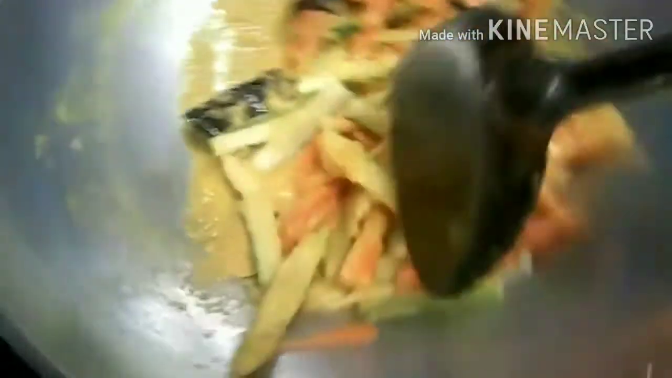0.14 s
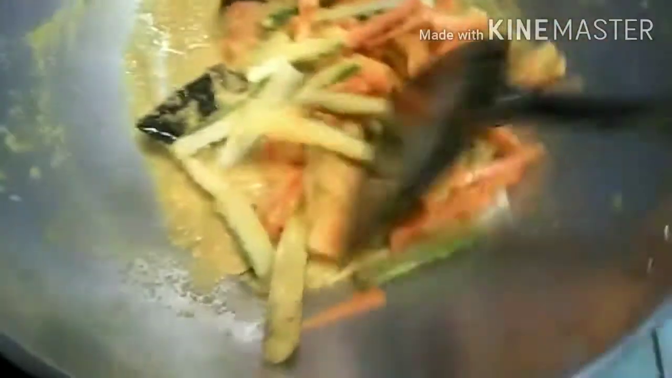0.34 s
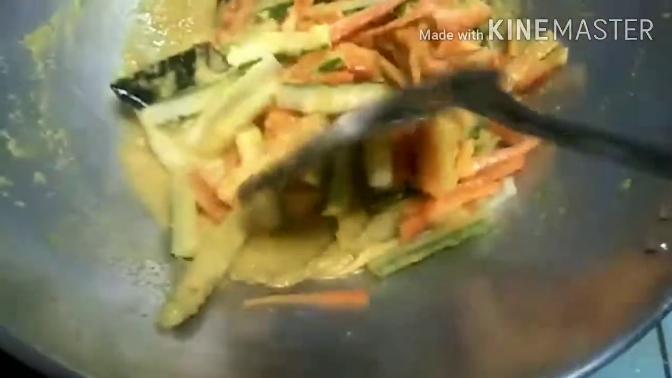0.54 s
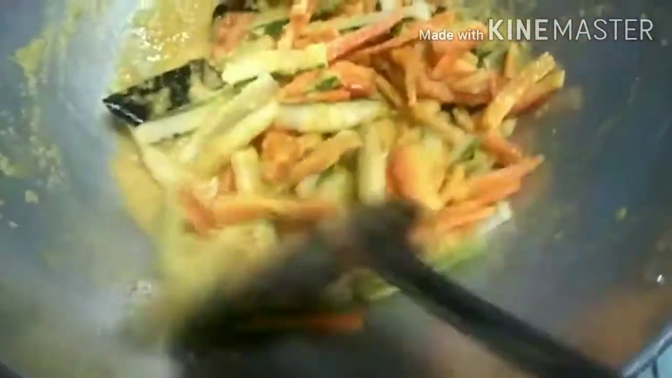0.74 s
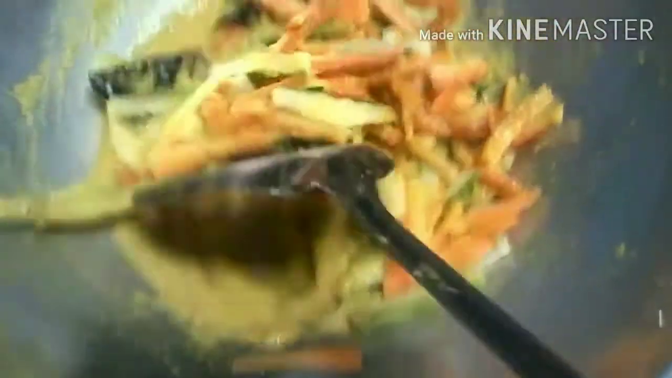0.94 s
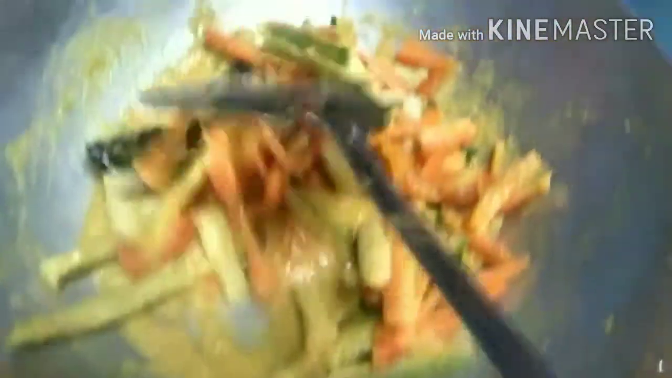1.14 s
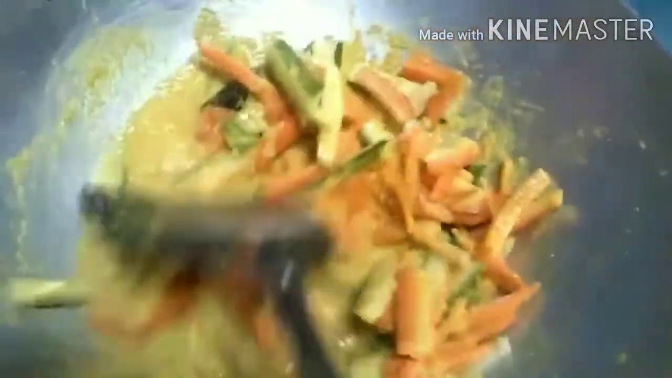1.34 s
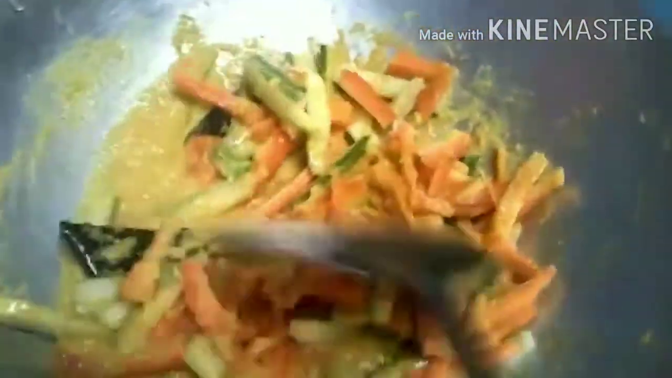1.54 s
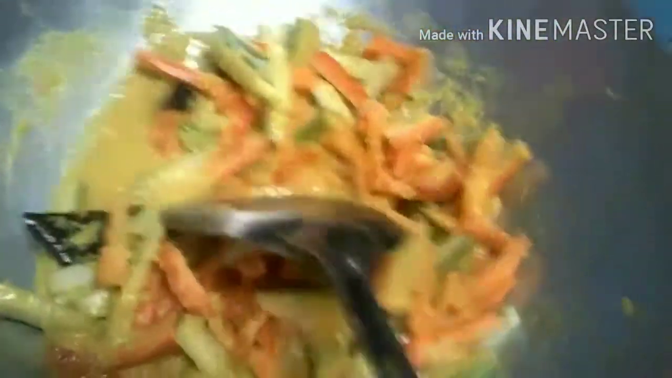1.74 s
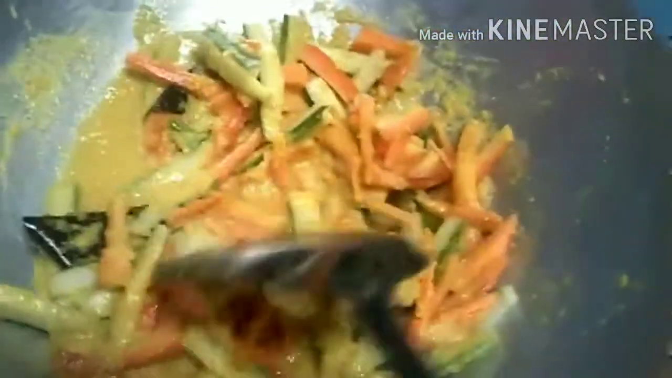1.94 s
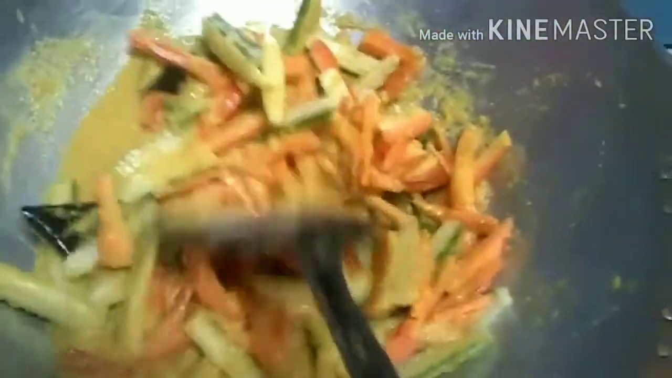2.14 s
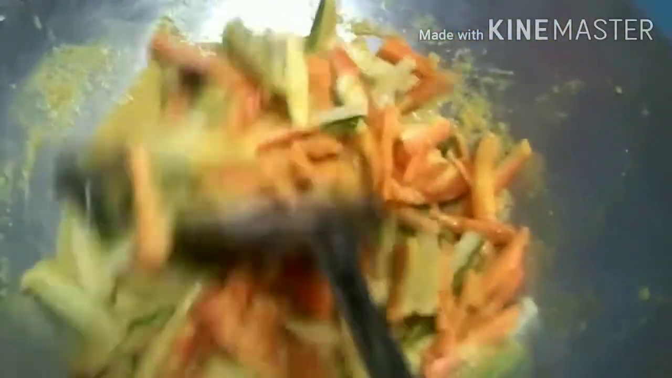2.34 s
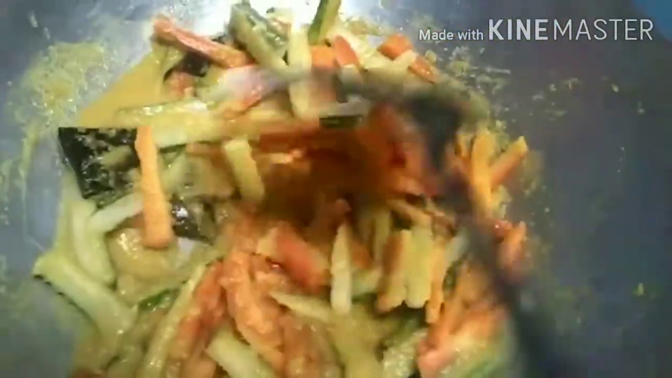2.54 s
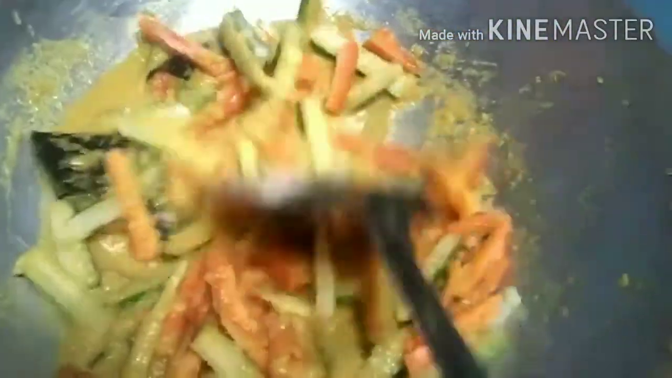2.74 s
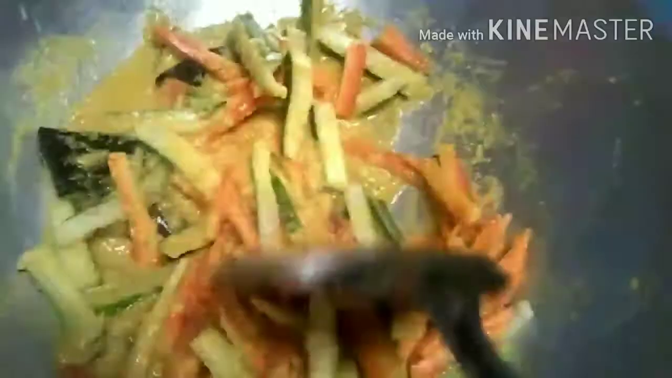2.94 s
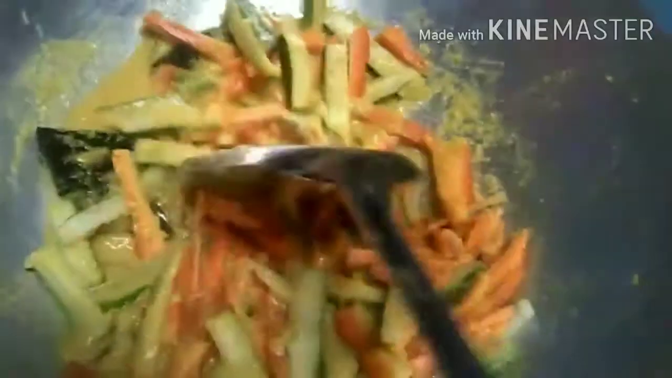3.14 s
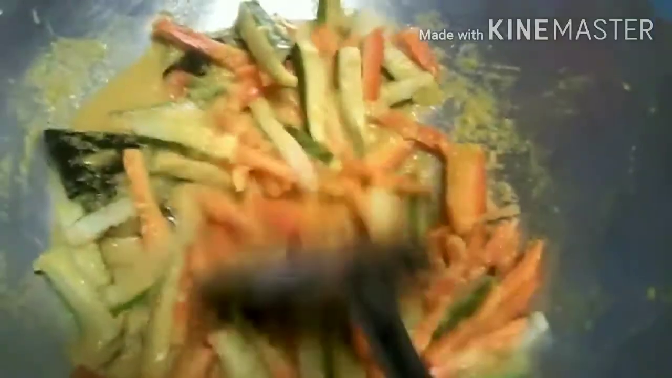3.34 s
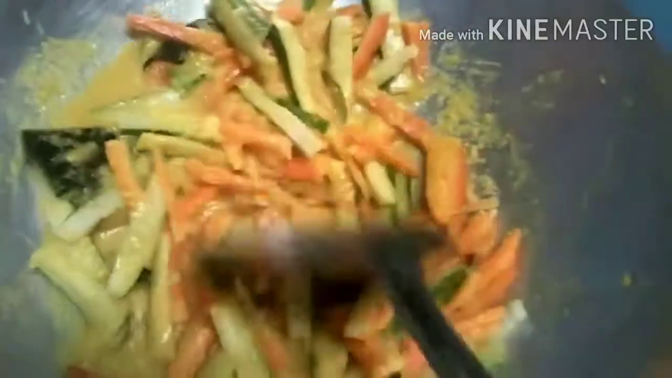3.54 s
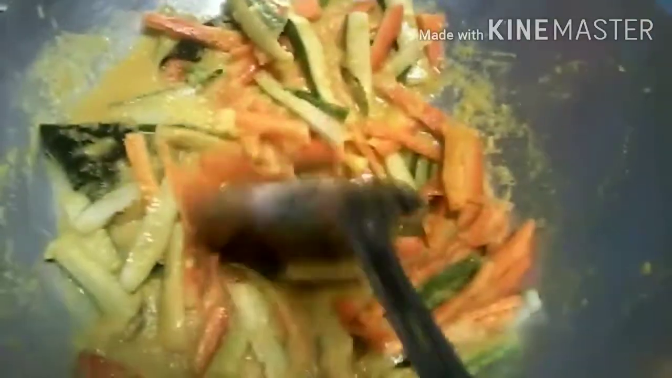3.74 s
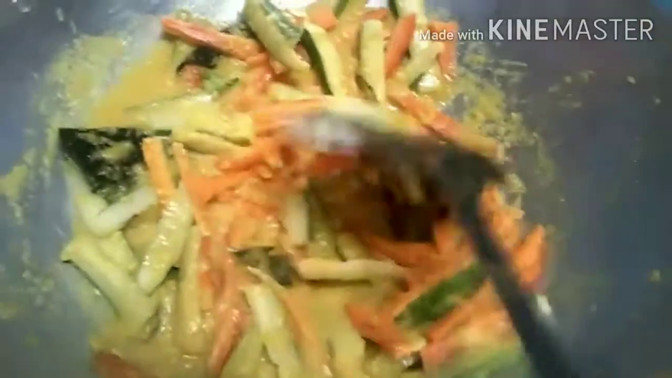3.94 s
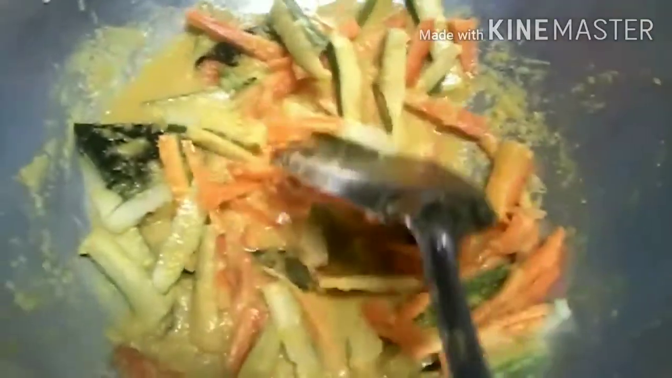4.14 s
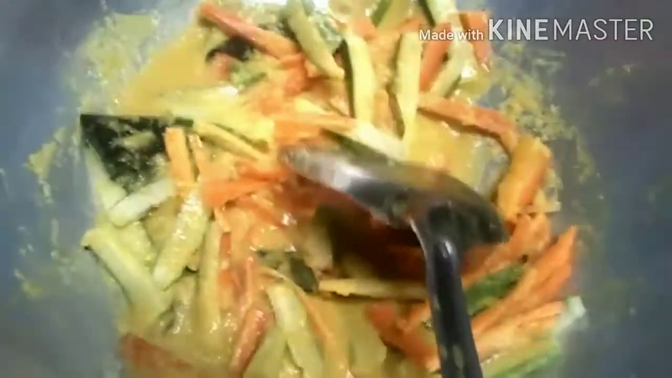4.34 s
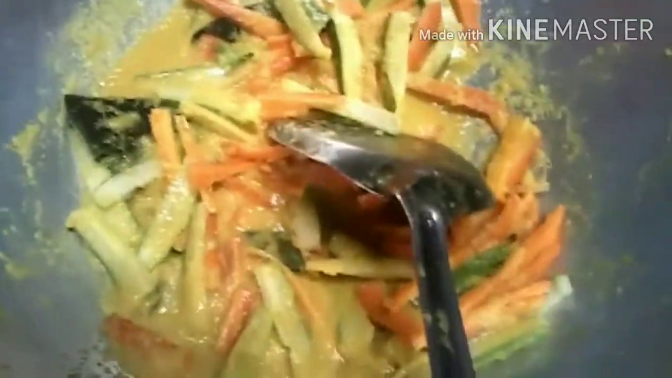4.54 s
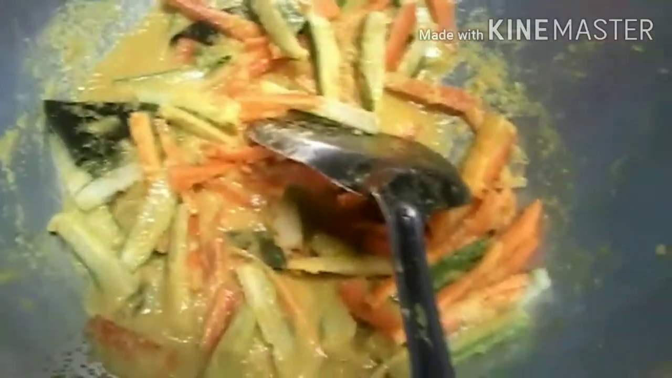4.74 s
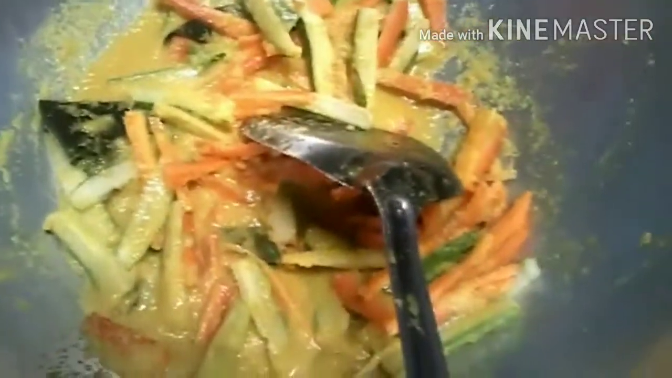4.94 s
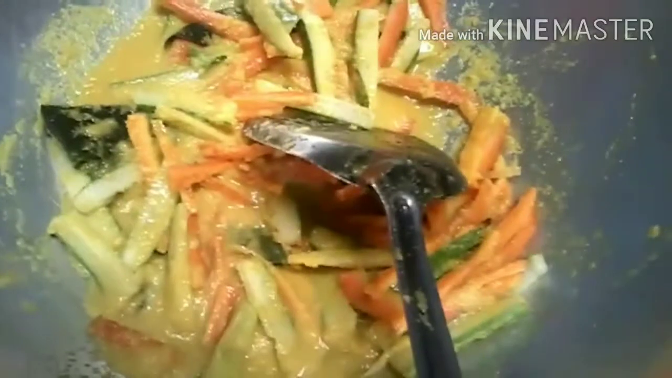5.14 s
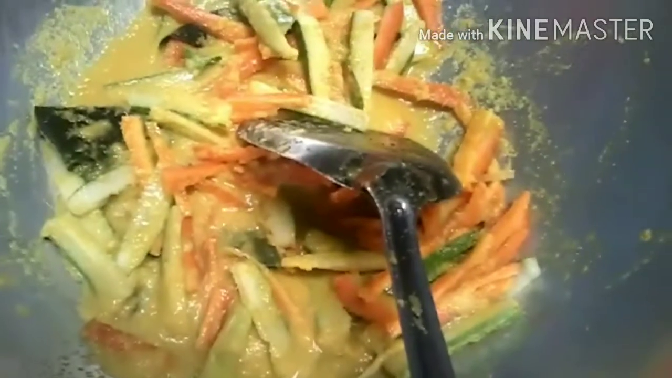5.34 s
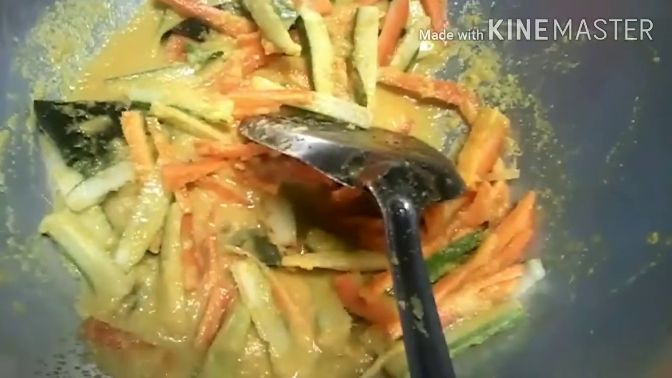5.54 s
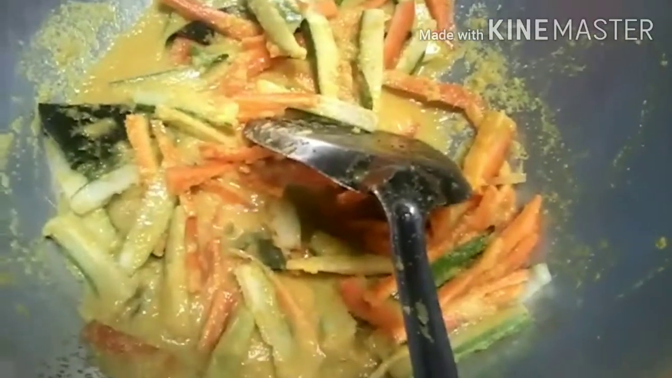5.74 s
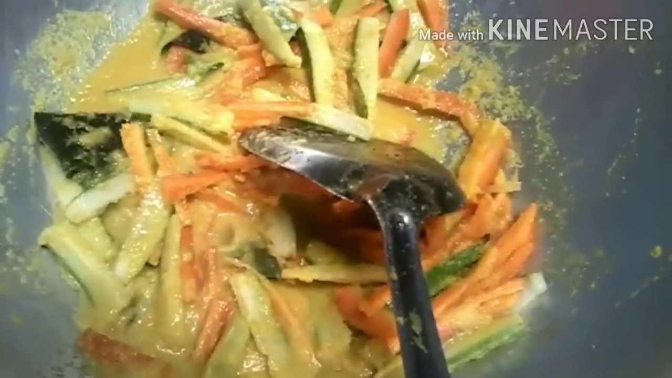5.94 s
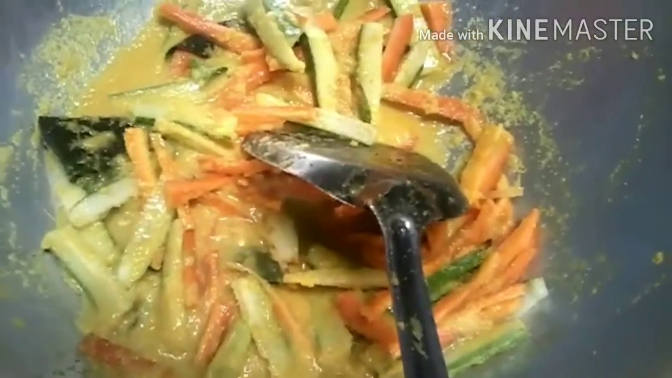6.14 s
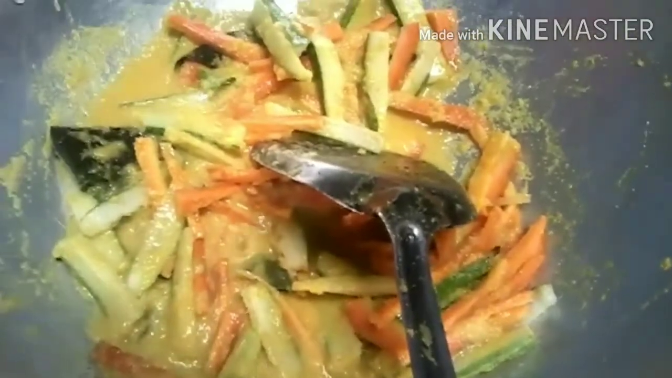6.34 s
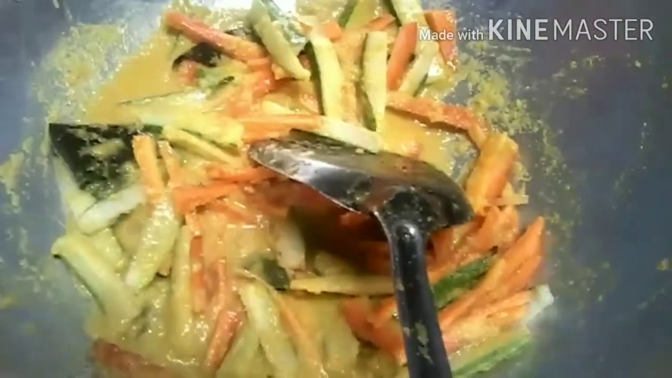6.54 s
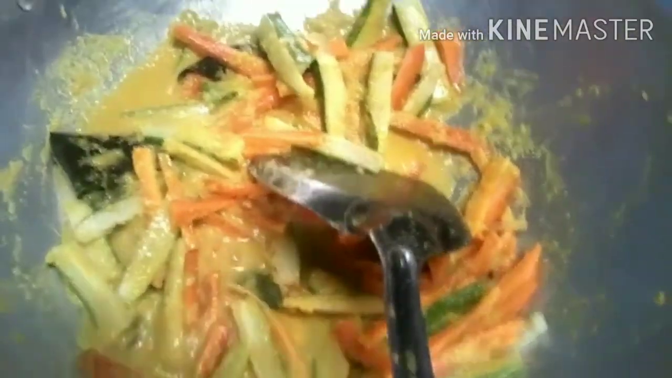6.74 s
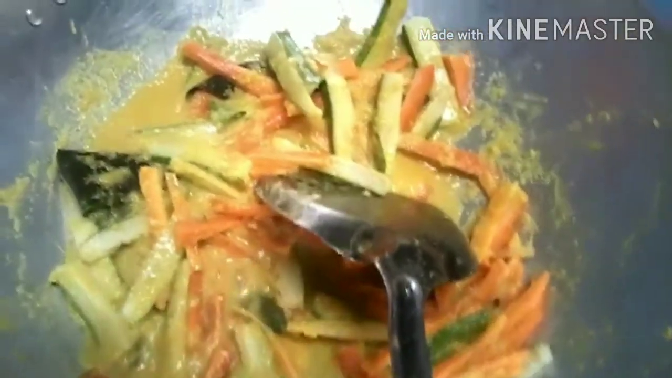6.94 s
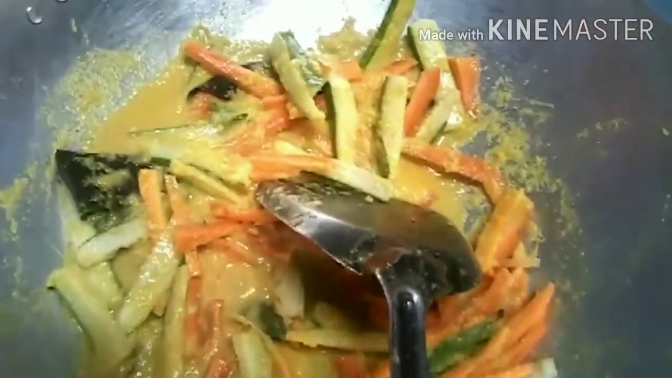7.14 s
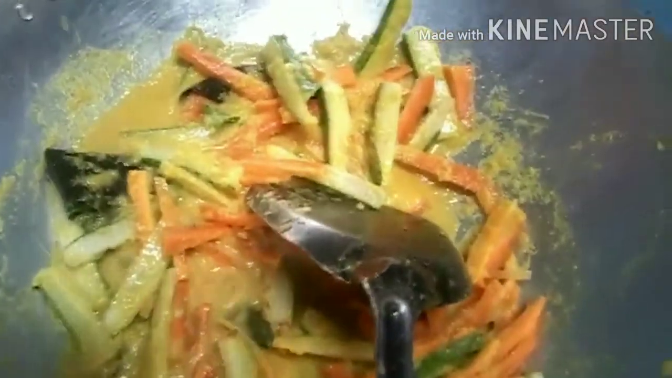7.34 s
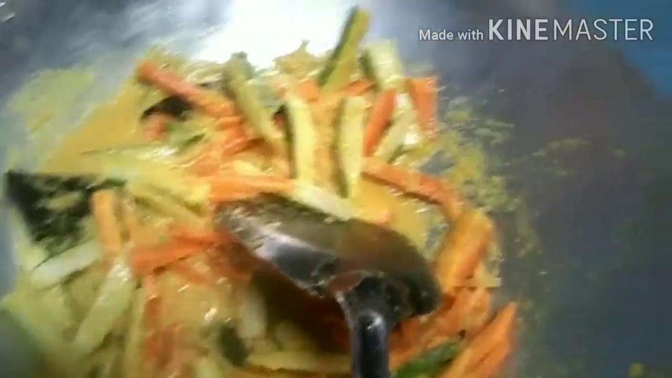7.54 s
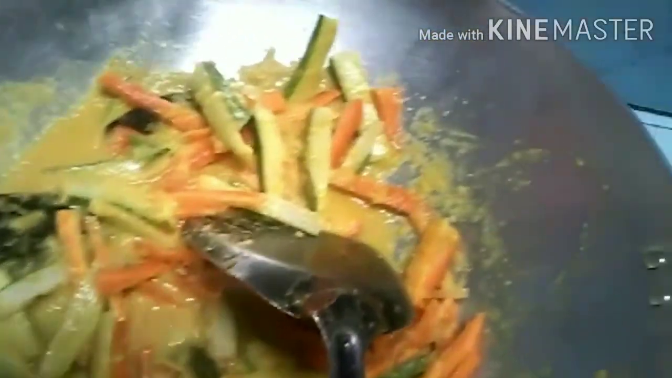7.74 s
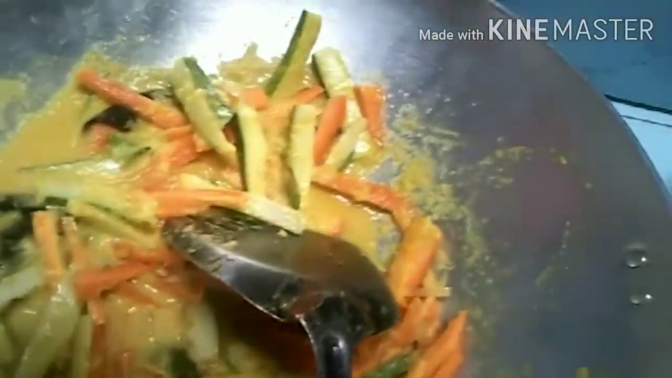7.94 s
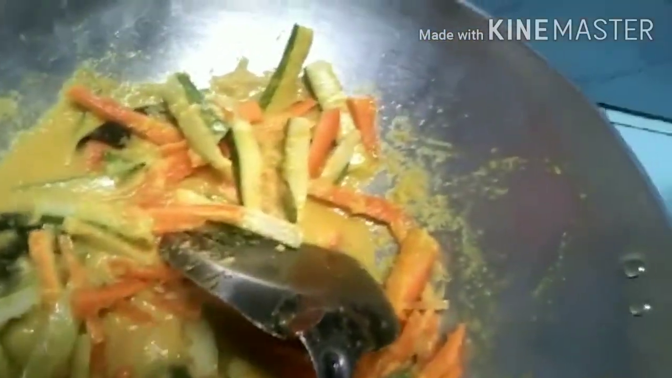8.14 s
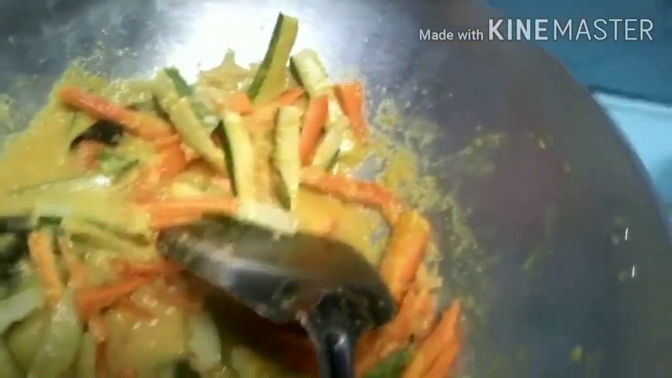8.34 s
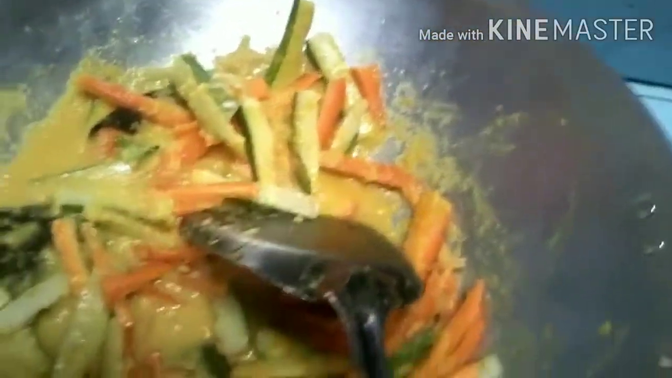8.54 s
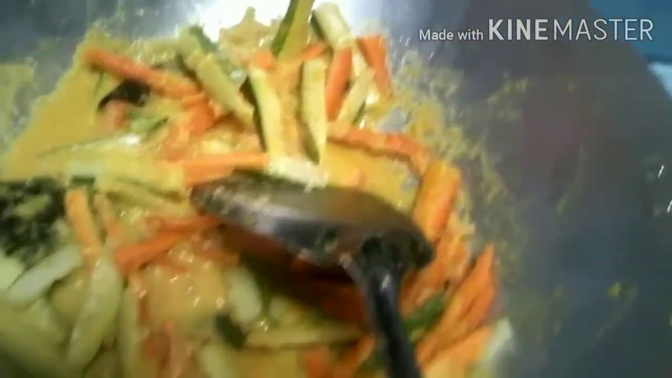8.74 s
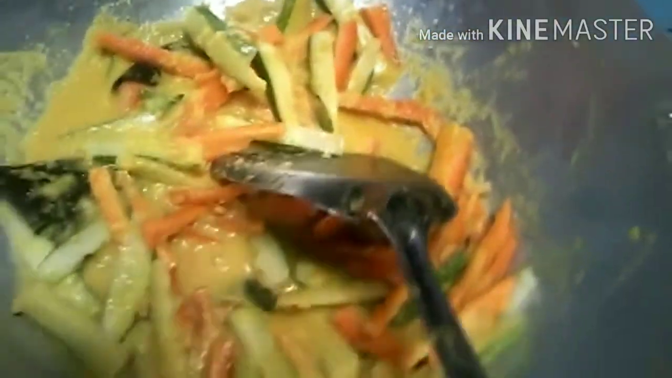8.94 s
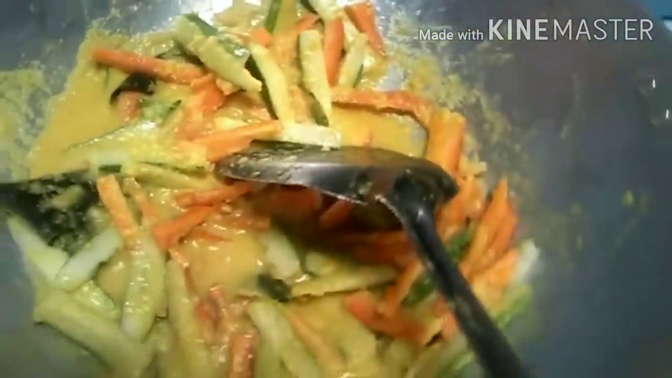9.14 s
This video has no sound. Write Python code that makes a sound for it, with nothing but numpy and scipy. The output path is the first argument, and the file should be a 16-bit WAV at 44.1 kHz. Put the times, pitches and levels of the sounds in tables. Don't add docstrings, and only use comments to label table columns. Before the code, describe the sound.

Stirring in a wok, heard close through a phone microphone: a sharp ringing blow early, brisk wet swishes and gritty metal rubs, then a heavy clank with a fast bounce and a closing tap. The spatula rests. Small high bubbles tick singly over a faint simmer, the wok grinds softly on its stand, and frying hiss thickens while the flame rumbles underneath, with short hard room echo.

```python
import sys
import numpy as np
from scipy import signal
from scipy.fft import rfft, irfft
from scipy.io import wavfile
from scipy.ndimage import uniform_filter1d

SR = 44100
rng = np.random.default_rng(int(sys.argv[2]) if len(sys.argv) > 2 else 0)


def wrap_up_sound(samples):
    columns = np.atleast_2d(samples).T
    tamed = np.clip(columns, -1, 1)
    steps = np.round(tamed * 32767).astype(np.int16)
    wavfile.write(sys.argv[1], SR, steps)


def voltage_ratio(level):
    return 10 ** (np.asarray(level, float) / 20)


N = 404838


def level(x, db=0):
    return x * voltage_ratio(db) / np.sqrt(np.mean(x ** 2))


def over_time(s, value):
    return np.interp(np.arange(N) / SR, s, value)


def colour(x, spectrum):
    hz, db = np.transpose(spectrum)
    log_hz = np.log(np.maximum(np.fft.rfftfreq(4096, 1 / SR), 1))
    cepstrum = irfft(np.interp(log_hz, np.log(hz), db) * np.log(10) / 20)
    cepstrum[1:2048] *= 2
    cepstrum[2049:] = 0
    response = irfft(np.exp(rfft(cepstrum)))
    return signal.fftconvolve(x, response)[:len(x)]


def resonate(x, hz, width):
    return signal.lfilter(*signal.iirpeak(hz, hz / width, SR), x)


def walk(rate):
    hold = int(SR / rate)
    steps = np.repeat(rng.standard_normal(N // hold + 1), hold)
    return 1.3 * uniform_filter1d(uniform_filter1d(steps, hold), hold)[:N]


def grains(rate, spread_db):
    hit = rng.random(N) < rate / SR
    size_db = spread_db * np.minimum(rng.exponential(size=N), 4)
    return hit * rng.choice([-1, 1], N) * voltage_ratio(size_db)


def add(out, s, sound):
    i = int(s * SR)
    out[i:i + len(sound)] += sound[:N - i]


def fade(t, t60):
    return np.exp(-np.log(1000) * t / t60)


def kitchen():
    # hz, t60_s
    room_decay = [(150, 0.52), (700, 0.4), (2000, 0.48), (5000, 0.42), (13000, 0.34)]
    t = np.arange(SR // 2) / SR
    hz, t60 = np.transpose(room_decay)
    tail = np.zeros(len(t))
    for f in 110 * 2 ** np.arange(0, 7.4, .5):
        band = level(resonate(rng.standard_normal(len(t)), f, f / 3))
        tail += band * np.sqrt(f) * fade(t, np.interp(np.log(f), np.log(hz), t60))
    tail *= 1 - np.exp(-(t / 0.0032) ** 2)
    return tail / np.sqrt(np.sum(tail ** 2))


def sizzle(db):
    # hz, level_db_per_hz
    frying_spectrum = [(410, -32), (700, -19), (1020, -5.5), (1360, -13), (1540, -8), (2080, -5), (2400, 2),
                       (3070, -2.5), (3970, -0.5), (4700, -4), (5080, -4), (7220, -4), (9600, -17.5),
                       (15500, -29)][:-1]
    simmer_db = -61.5
    bubbles = np.zeros(N)
    for hz in 1000 * 2 ** np.arange(0, 4, .5):
        one_size = level(resonate(grains(250, spread_db=3.0), hz, 0.37 * hz))
        bubbles += np.sqrt(hz) * one_size * voltage_ratio(3.6 * walk(18))
    spatter = level(grains(500, spread_db=1.0))
    steam = rng.standard_normal(N)
    patches = voltage_ratio(1.5 * walk(30))
    frying = patches * (level(bubbles) + voltage_ratio(-8.5) * spatter) + voltage_ratio(2) * steam
    return np.hypot(voltage_ratio(db), voltage_ratio(simmer_db)) * level(colour(frying, frying_spectrum))


def grind(db):
    # pitch_hz, width_hz, level_db
    bowl_modes = [(259.6, 77, 4), (393, 34, -2), (621, 107, 2.5), (770, 135, -6), (1007, 98, -9.5)]
    jolts = level(grains(2500, spread_db=2.5)) * voltage_ratio(1.5 * walk(30))
    body = np.zeros(N)
    for hz, width, db_mode in bowl_modes:
        mode = resonate(resonate(jolts, hz, 2 * width), hz, 2 * width)
        body += level(mode, db_mode) * voltage_ratio(1.5 * walk(12))
    return level(body) * voltage_ratio(db)


def sing(db):
    # pitch_hz, width_hz, level_db
    steel_modes = [(1350, 19, -5), (1850, 19, 0), (2434, 13, -1), (2950, 40, -3), (3780, 15, -10),
                   (6000, 25, -12.5)]
    rub = rng.standard_normal(N)
    song = np.zeros(N)
    for hz, width, db_mode in steel_modes:
        song += level(resonate(rub, hz, width), db_mode) * voltage_ratio(3 * walk(8))
    return voltage_ratio(db) * song


def burner():
    # hz, level_db_per_hz
    flame_spectrum = [(12, -52), (20, -4), (113, 5), (231, -11), (284, -4.5), (473, -11.5), (716, -14.5),
                      (880, -35), (1800, -22.5), (2340, -52), (3960, -120)]
    # time_s, level_db
    flame_course = [
        [(0.0, -62), (2.53, -64), (2.6, -61)],
        [(2.7, -67.5), (4.024, -59.5), (4.4, -69)],
        [(4.45, -67), (7.37, -58), (8.7, -56.5)],
        [(8.75, -58), (8.85, -60), (8.97, -54)],
        [(8.99, -53), (9.142, -56.5), (9.18, -48)],
    ]
    # pitch_hz, level_db
    hum_lines = [(113.0, -69), (193.8, -66), (290.7, -68), (339.1, -66), (576.0, -73), (726.7, -76.5)]
    flame_db = 6.0 + over_time(*np.concatenate(flame_course).T)
    flame = level(colour(rng.standard_normal(N), flame_spectrum)) * voltage_ratio(flame_db)
    hum = sum(level(resonate(rng.standard_normal(N), hz, 6.5), db) for hz, db in hum_lines)
    return flame + hum


def bursts(table, cycles, click_db):
    out, t = np.zeros(N), np.arange(SR // 16) / SR
    lengths = cycles * (0.38 + 0.88 * rng.random(len(table)))
    for (s, db, hz), length in zip(table, lengths):
        note = np.sin(2 * np.pi * hz * t * (1.006 + 0.23 * hz * t / length / 4))
        note *= (1 - fade(t, 5.6 / hz)) ** 2 * fade(t, length / hz)
        click = rng.standard_normal(len(t)) * (1 - fade(t, 6.0 / hz)) * fade(t, 2.5 * length / hz)
        for _ in range(2):
            click = resonate(click, 1.01 * hz, 0.76 * hz)
        burst = note / np.abs(note).max() + voltage_ratio(click_db) * click / np.abs(click).max()
        add(out, s, voltage_ratio(db) * burst)
    return out


def bubbles_and_knocks():
    # start_s, peak_db, pitch_hz
    lone_bubbles = [(0.0882, -39, 5360), (0.1481, -34, 7670), (0.2478, -3.5, 6750), (0.4993, -31, 3290),
                    (0.6374, -43, 3690), (0.6698, -51, 2430), (0.6818, -34.5, 8160), (0.6993, -29, 3910),
                    (0.7841, -39, 4190), (0.8106, -35, 6950), (0.841, -37.5, 2520), (1.1074, -39, 2000),
                    (1.1074, -33.5, 2450), (1.2935, -43, 2040), (1.396, -41, 2970), (1.501, -28, 7560),
                    (1.5269, -25, 4790), (1.6571, -40, 3980), (1.7814, -39, 2340), (1.8103, -30, 2740),
                    (1.8437, -29, 3600), (1.8652, -25, 5350), (1.8826, -22.5, 2410), (1.9235, -34, 4210),
                    (2.16, -44, 2800), (2.1605, -37, 2260), (2.2308, -52, 3820), (2.2917, -33.5, 3780),
                    (2.3106, -36, 4470), (2.427, -43, 3000), (2.4698, -48, 2990), (2.4853, -42, 3810),
                    (2.4977, -35, 2500), (2.5306, -38, 2500), (2.5546, -28, 5020), (2.7876, -41, 3010),
                    (2.81, -31.5, 2420), (2.8355, -34.5, 2330), (3.014, -41, 4890), (3.1223, -45, 2500),
                    (3.1375, -45, 2450), (3.2036, -39, 2540), (3.3822, -39, 3010), (3.489, -12, 2810),
                    (3.5483, -5.5, 2720), (3.8736, -42.5, 3140), (3.9699, -34, 4290), (3.9843, -2.5, 3680),
                    (4.2577, -46.5, 3830), (4.2911, -43, 3800), (4.3804, -36, 7780), (4.4114, -36.5, 4190),
                    (4.5002, -44, 2620), (4.561, -48, 2490), (4.58, -39.5, 4220), (4.6209, -50, 2660),
                    (4.7027, -50, 2550), (4.7301, -37, 4160), (4.7955, -37, 4220), (4.8157, -37.5, 4150),
                    (4.8778, -42.5, 4900), (4.9661, -30.5, 4900), (5.0599, -32, 4190), (5.1113, -47, 2550),
                    (5.1422, -29, 4810), (5.227, -28, 4810), (5.252, -37, 3810), (5.3338, -40, 4140),
                    (5.3536, -44, 5060), (5.438, -36.5, 4050), (5.4824, -38.5, 2720), (5.5498, -40.5, 2630),
                    (5.6496, -38.5, 4300), (5.7069, -42, 3620), (5.7159, -39, 3840), (5.7693, -29.5, 7240),
                    (5.8875, -39.5, 2810), (5.9554, -34.5, 4260), (6.0023, -49, 2970),
                    (6.0023, -27.5, 2790), (6.0277, -41, 2270), (6.0621, -42, 3210), (6.113, -49, 3750),
                    (6.1424, -42, 3670), (6.1784, -46, 2390), (6.1993, -31, 2490), (6.2392, -32, 4200),
                    (6.2587, -35, 6980), (6.2931, -35, 3300), (6.2931, -35, 2380), (6.3195, -33.5, 4200),
                    (6.4632, -42, 2720), (6.5016, -35.5, 3600), (6.5321, -41, 3890), (6.549, -43, 2460),
                    (6.6039, -30.5, 2550), (6.6223, -35, 2950), (6.6997, -49, 2540), (6.7306, -32.5, 2820),
                    (6.8249, -31.5, 3810), (6.8423, -35, 2790), (6.8862, -27, 5050), (6.9117, -32, 4860),
                    (6.9441, -35, 3930), (6.9696, -31, 2500), (6.9845, -18, 4140), (7.017, -20, 4140),
                    (7.0444, -27, 4430), (7.0643, -26.5, 3890), (7.1067, -35, 4180), (7.1596, -34.5, 3830),
                    (7.22, -43, 2350), (7.3307, -30.5, 4050), (7.3961, -22.5, 3980), (7.5567, -47, 2780),
                    (7.7204, -37, 3990), (7.7867, -35, 3980), (7.8605, -38, 2820), (7.9803, -37, 4260),
                    (8.0596, -30.5, 4170), (8.095, -35, 4220), (8.2362, -36.5, 2900), (8.7041, -33, 4210),
                    (8.8952, -32, 2720), (8.9251, -22, 2610), (8.9451, -24.5, 3750), (8.989, -38, 2720),
                    (9.0688, -36, 4000)]
    # start_s, peak_db, pitch_hz
    knocks = [(0.406, -38, 250), (1.102, -41.5, 517), (1.607, -38, 261), (1.883, -28, 592),
              (2.169, -46, 342), (2.613, -42, 207), (2.809, -42, 430), (4.482, -36.5, 240),
              (5.117, -54, 202), (7.483, -41.5, 204), (8.912, -38, 305)]
    direct = bursts(lone_bubbles, cycles=30.0, click_db=-3) + bursts(knocks, cycles=15.8, click_db=0)
    return direct + voltage_ratio(-14) * signal.fftconvolve(direct, kitchen())[:N]


def beating(hz, t):
    split, turn = rng.random((2, 4, 1))
    tones = np.sin(2 * np.pi * (hz * (1 + .02 * (split - .5)) * t + turn))
    return tones.sum(axis=0) / 2


def clacks():
    # start_s, peak_db, crack_hz, bowl_thump_db, kitchen_db, contact_s
    blows = [
        (0.2473, -3, 6600, -27.5, -6.5, 0.0055),
        (3.489, -6, 2850, -12, -13, 0.0026),
        (3.5474, -15, 2670, -37, -2, 0.0029),
        (3.9832, -9.5, 3830, -38, -12.5, 0.0082),
    ]
    # pitch_hz, level_db, t60_s
    edge_modes = [(702, -7.5, 0.25), (1136, -13.5, 0.28), (1370, -15, 0.63), (1846, -8.5, 0.32),
                  (2210, -16.5, 0.55), (2460, 0.5, 0.13), (2650, -0.5, 0.17), (3760, 0, 0.36),
                  (4030, -9.5, 1.9), (4240, -8.5, 0.54), (4600, -24, 0.81), (4670, -15, 0.68),
                  (5170, -18, 5.0), (6540, -3.5, 0.2), (6690, -6, 0.4), (6800, -1.5, 0.32),
                  (7450, -7, 0.24), (7730, -10.5, 0.98)]
    flat_modes = [(2520, -5.5, 0.14), (2760, -6.5, 0.14), (3935, -8, 5.0), (4154, -11.5, 0.68),
                  (4942, -8, 0.35), (5540, -22, 0.3), (5950, -10.5, 0.27), (6670, -10, 5.0),
                  (7400, -5, 0.18)]
    bounce_modes = [(956, -5, 0.29), (1350, -8.5, 0.48), (2172, -14, 0.28), (2720, -10, 0.5),
                    (3670, -18, 1.4), (3600, 6, 5.0), (4256, 0, 2.0), (4950, -10, 0.53), (5300, -1.5, 0.28),
                    (6400, -14, 2.9), (6422, -15.5, 0.53), (7101, -3, 0.79), (7500, -6.5, 0.34),
                    (7730, -4.5, 0.37)]
    tap_modes = [(646, -18, 5.0), (926, -5.5, 0.14), (1400, -16, 5.0), (1760, -6, 0.093), (2145, -4, 0.14),
                 (2590, -17.5, 0.45), (3960, -33, 1.8), (4140, -31.5, 5.0), (5050, -10, 0.25),
                 (6300, -19, 0.34), (6500, -25, 0.65), (7200, -2, 0.2)]
    # hz, level_db_per_hz
    crack_spectrum = [(88, -6.5), (150, -15.5), (695, -4.5), (812, -2.5), (966, 0), (1660, -8),
                      (1830, -23.5), (1980, -4.5), (2450, -4), (3760, 0), (5540, -1), (6600, -13.5),
                      (15500, -32)][:-1]
    longest_ring_s = .45
    out, t = np.zeros(N), np.arange(SR // 2) / SR
    for blow, modes in zip(blows, (edge_modes, flat_modes, bounce_modes, tap_modes)):
        s, db, crack_hz, thump_db, room_db, contact = blow
        chatter = rng.standard_normal(len(t)) * (1 - fade(t, 0.0048)) * fade(t, 4 * contact)
        rattle = colour(chatter, crack_spectrum)
        crack = resonate(rattle, crack_hz, 1.2 * crack_hz) + voltage_ratio(4.5) * rattle
        ring = sum(voltage_ratio(g) * fade(t, min(t60, longest_ring_s)) * beating(hz, t) for hz, g, t60 in modes)
        ring = ring * (1 - fade(t, 0.0011))
        thump = voltage_ratio(thump_db) * np.sin(2 * np.pi * 480 * t) * (1 - fade(t, 0.0022)) * fade(t, 0.015)
        room = kitchen()
        wash = colour(room, crack_spectrum)
        struck = crack / np.abs(crack).max() + voltage_ratio(-15.5) * ring
        struck = struck + voltage_ratio(room_db) * wash / np.abs(wash).max()
        thump_echo = voltage_ratio(3.0) * signal.fftconvolve(thump, room)[:len(t)]
        add(out, s, voltage_ratio(db) * struck + thump + thump_echo)
    return out


def scene():
    # time_s, sauce_hiss_db, bowl_grinding_db, steel_singing_db
    strokes = [
        [(0.0, -54.5, -63.5, -71), (0.21, -61, -76, -79), (0.235, -59, -70, -69)],
        [(0.38, -45, -45, -58), (0.426, -48, -43.5, -69), (0.6, -59, -78, -69)],
        [(0.62, -59, -68, -69), (0.708, -50.5, -63, -78), (0.75, -54, -67, -81)],
        [(0.76, -60, -51, -81), (0.85, -46.5, -54, -67), (0.88, -54, -55, -75)],
        [(0.9, -52, -47, -78), (0.97, -48.5, -40, -65), (1.08, -56.5, -49, -83)],
        [(1.09, -61, -63, -70), (1.104, -42.5, -50, -60), (1.2, -52, -56, -59)],
        [(1.22, -50, -53, -61), (1.24, -46.5, -44.5, -62), (1.36, -52.5, -47.5, -73)],
        [(1.38, -56, -55, -73), (1.43, -49.5, -59, -69), (1.48, -60, -65, -82)],
        [(1.49, -53.5, -56, -73), (1.534, -43.5, -49, -67), (1.63, -52, -53, -75)],
        [(1.65, -55, -50, -69), (1.684, -45.5, -57, -61), (1.75, -53.5, -54, -75)],
        [(1.76, -57, -51, -76), (1.786, -46.5, -41, -70), (1.87, -46.5, -50.5, -58)],
        [(1.88, -47, -43, -56), (1.884, -47, -33, -49), (2.0, -58, -56, -71)],
        [(2.02, -67, -63, -78), (2.128, -78, -77, -96), (2.14, -71, -76, -79)],
        [(2.15, -63, -75, -76), (2.17, -41.5, -48.5, -48), (2.21, -62, -60, -68)],
        [(2.23, -51.5, -54, -78), (2.368, -52.5, -63, -61), (2.45, -64, -61, -80)],
        [(2.46, -58.5, -74, -87), (2.556, -42, -49, -55.5), (2.6, -47, -56, -63)],
        [(2.62, -51, -44, -80), (2.732, -77, -76, -98), (2.77, -76, -73, -85)],
        [(2.78, -76, -89, -62), (2.806, -43.5, -57, -65), (2.95, -50, -48, -64)],
        [(2.97, -54, -59, -78), (3.03, -55.5, -71, -78), (3.1, -73, -72, -96)],
        [(3.11, -73, -65, -81), (3.136, -49.5, -58, -63), (3.18, -62, -58, -77)],
        [(3.19, -53, -65, -70), (3.236, -48, -53, -62), (3.3, -68, -73, -75)],
        [(3.32, -68, -78, -78), (3.398, -57, -76, -61), (3.475, -79, -62, -72)],
    ]
    # time_s, sizzle_db, bowl_grinding_db
    frying = [
        [(3.8, -56, -48.5), (3.826, -73, -70), (3.97, -56, -56)],
        [(4.2, -62.5, -64), (4.428, -64.5, -69), (4.47, -74, -68)],
        [(4.49, -62.5, -51.5), (4.696, -60, -69), (5.0, -62.5, -62)],
        [(5.02, -59, -66), (5.208, -59, -55), (5.5, -62, -66)],
        [(5.52, -59, -66), (5.554, -56, -64), (6.1, -54, -62)],
        [(6.12, -53.5, -63), (6.552, -54, -62), (6.8, -49, -55)],
        [(6.84, -49, -58), (6.91, -48.5, -44), (7.1, -44, -46.5)],
        [(7.12, -46, -46.5), (7.384, -45, -44.5), (7.45, -43.5, -54)],
        [(7.5, -48.5, -55), (7.688, -47, -58.5), (8.3, -42.5, -55)],
        [(8.4, -41.5, -56), (8.41, -41, -53.5), (9.18, -40.5, -57.5)],
    ]
    stir, fry = np.concatenate(strokes), np.concatenate(frying)
    s, hiss_db, grind_db = np.concatenate([stir[:, :3], fry]).T
    sing_db = np.interp(np.arange(N) / SR, stir[:, 0], stir[:, 3], right=-120)
    friction = grind(over_time(s, grind_db)) + sing(sing_db)
    steady = sizzle(over_time(s, hiss_db)) + friction + burner()
    return (steady + bubbles_and_knocks() + clacks())[None]


def roll_off(x):
    return signal.sosfilt(signal.butter(12, 16460, fs=SR, output="sos"), x)


def record(dry):
    rounded = np.tanh(0.76 * dry) / 0.82
    top_cut = signal.ellip(8, .2, 60, 15850, fs=SR, output="sos")
    mix = signal.sosfilt(top_cut, rounded)
    return roll_off(mix)


dry = scene()
out = record(dry)
wrap_up_sound(out)
```